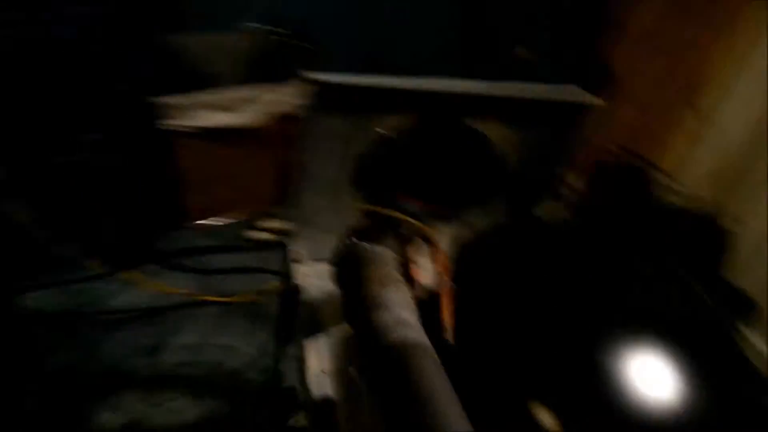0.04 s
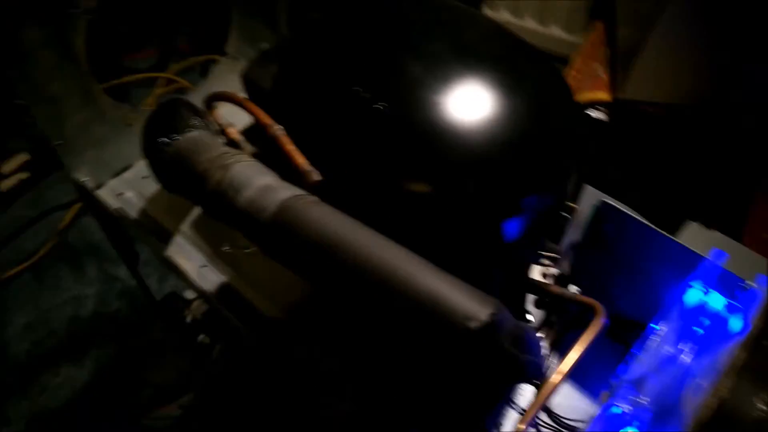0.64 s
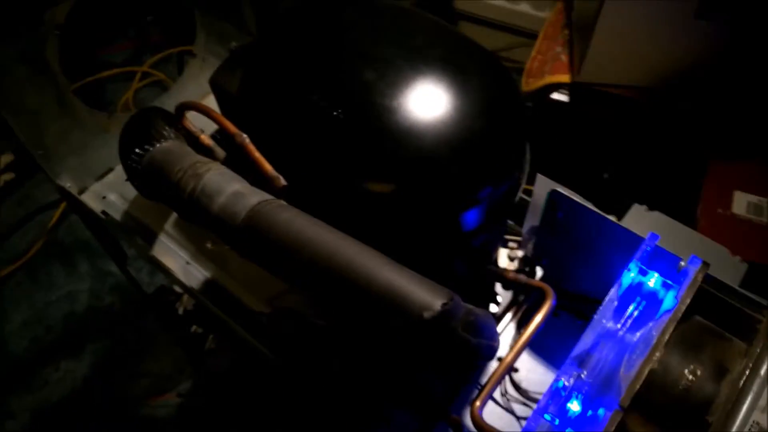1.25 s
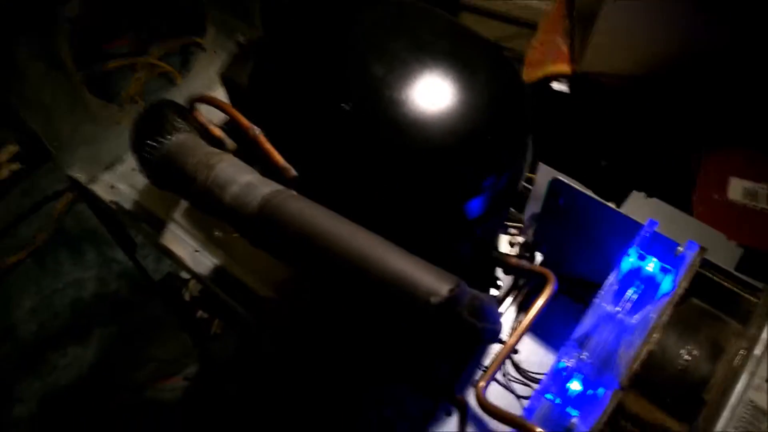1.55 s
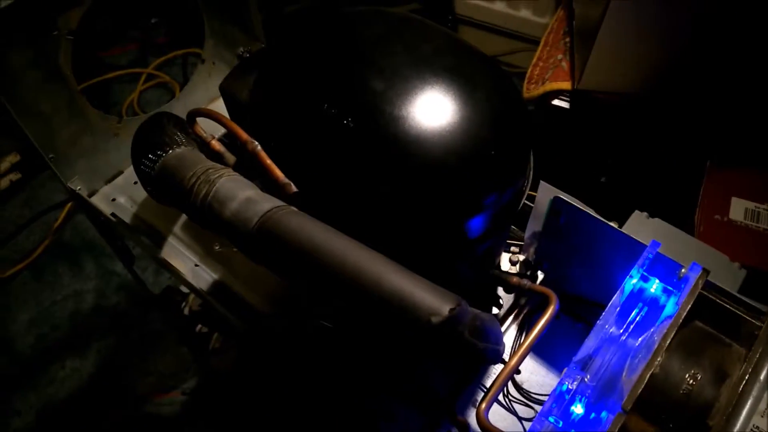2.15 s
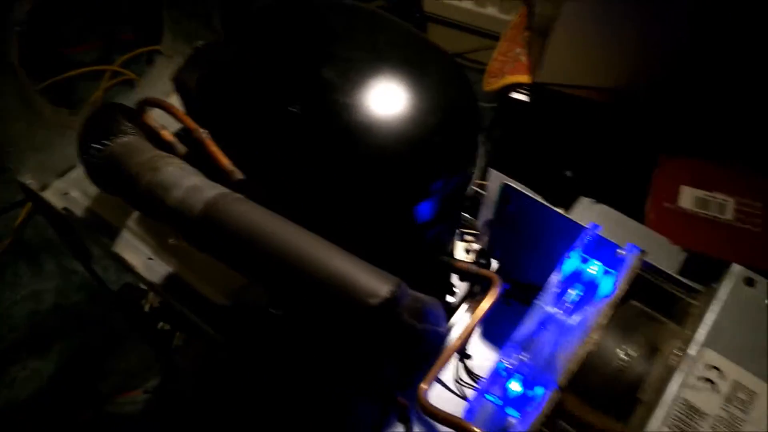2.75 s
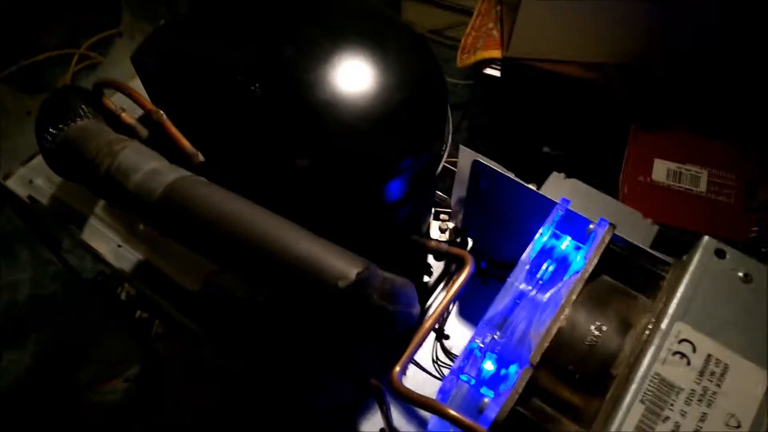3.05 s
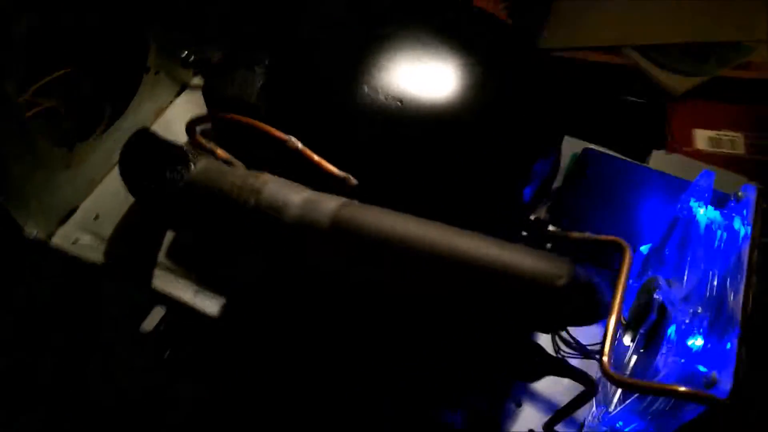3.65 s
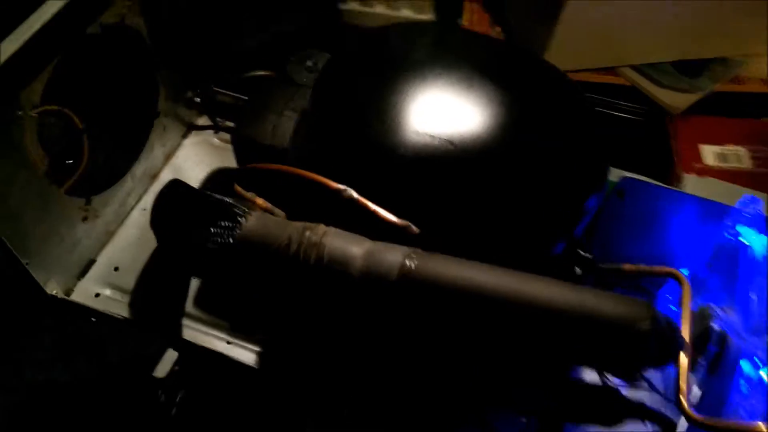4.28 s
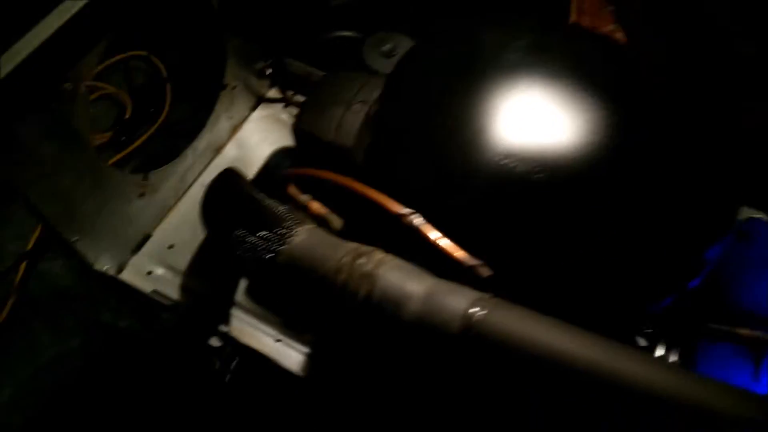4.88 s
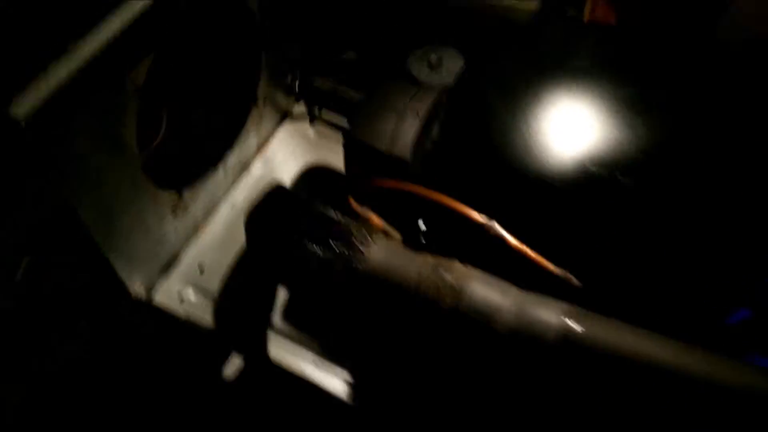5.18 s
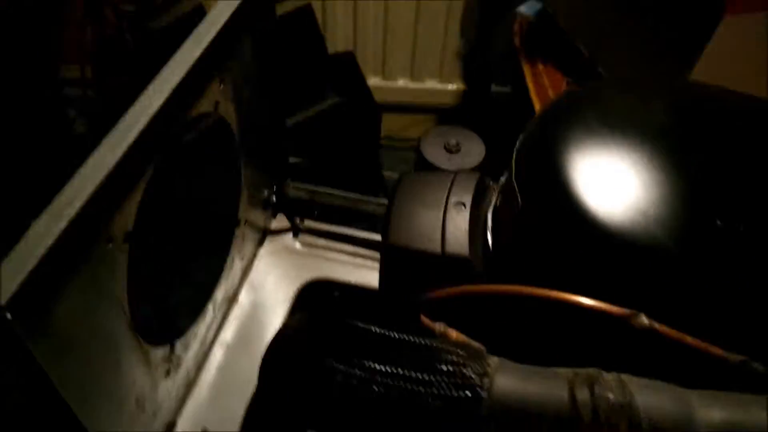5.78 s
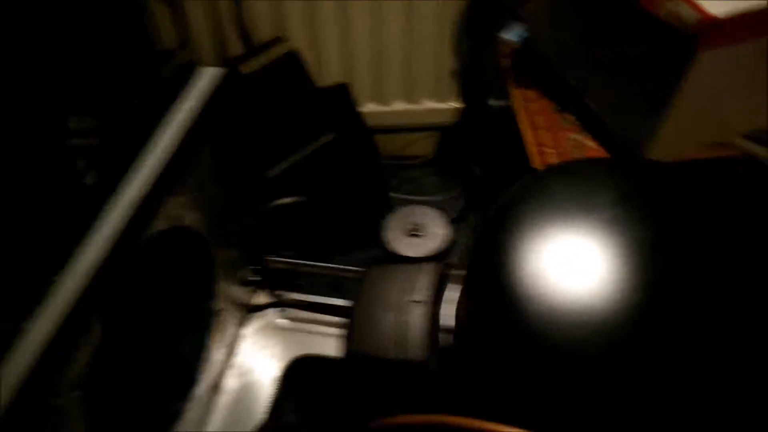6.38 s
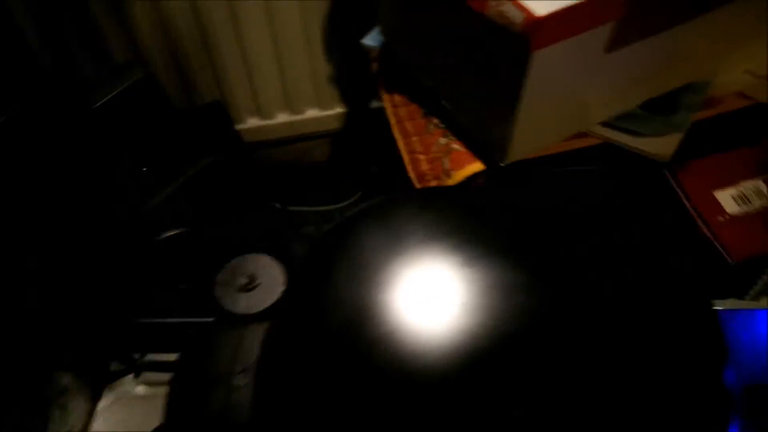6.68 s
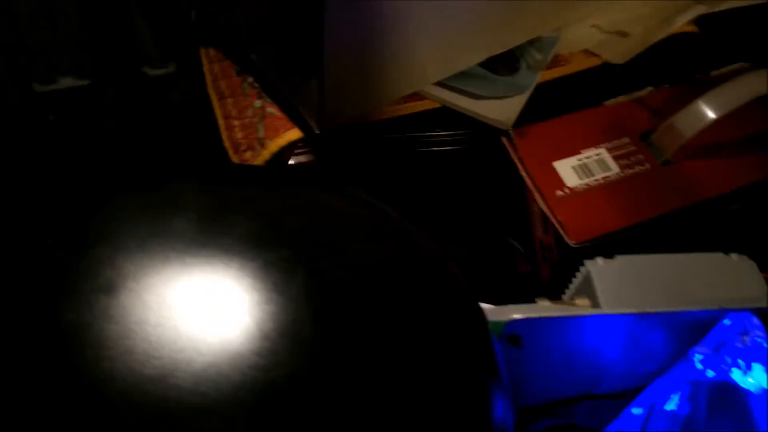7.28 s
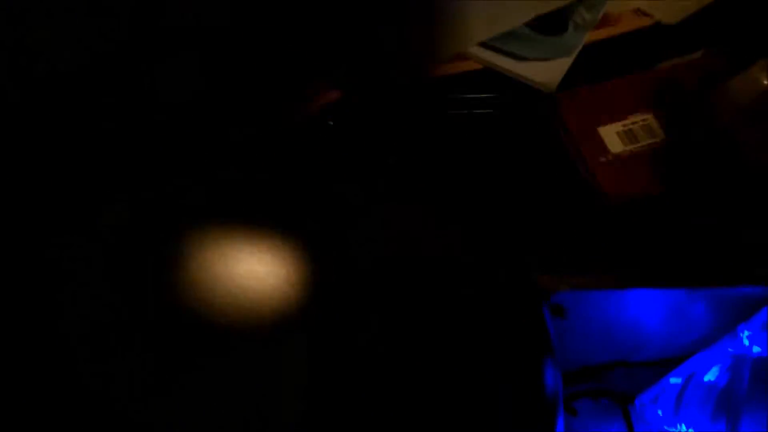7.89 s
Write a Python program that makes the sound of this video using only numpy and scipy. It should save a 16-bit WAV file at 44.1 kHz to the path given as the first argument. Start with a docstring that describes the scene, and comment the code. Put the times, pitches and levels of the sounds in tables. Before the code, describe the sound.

A cooling unit's fan and compressor whir and hum steadily with a thin, fast ticking, until a switch clicks sharply near the end.

```python
"""In a small room an open cooling unit runs. The piston strokes of its compressor excite the modes of
a steel shell, and gas sings in the pipes. A seven-blade fan adds tones, turbulent air noise and a
tick once a turn. A hand-held microphone moves through the standing waves above the unit, so each ring
swells and fades; fingers rub and bump it lightly. Near the end a switch snaps close by."""
import sys
import numpy as np
from scipy import signal
from scipy.fft import rfft, irfft, next_fast_len
from scipy.io import wavfile

SR = 44100
rng = np.random.default_rng(int(sys.argv[2]) if len(sys.argv) > 2 else 0)


def store_pcm(level_fs):
    """Save levels as 16-bit WAV."""
    pcm = np.round(np.clip(level_fs, -1, 1) * 32767).astype(np.int16)
    wavfile.write(sys.argv[1], SR, np.atleast_2d(pcm).T)


N = 358533
TIME = np.arange(N) / SR


# Shell and pipe modes. Each row: frequency and bandwidth in Hz, relative level and left-right
# difference in dB, name of the standing wave.
SHELL_MODES = [(2365, 45, -93, 13, "low ring"), (2474, 81, -84, -7.5, "low ring"),
               (2600, 23, -94, -4, "low ring"), (3089, 28, -78.5, -3, "twin ring"),
               (3256, 18, -81, -1.5, "low whistle"), (4242, 26, -82.5, 0, "middle ring"),
               (4526, 26, -77, 7.5, "middle whistle"), (6166, 28, -80, -4, "top ring"),
               (6430, 80, -90, -7, None), (8130, 58, -86.5, -15, None), (10200, 35, -89, -3, None)]
# Gas resonances in the pipes, with the same columns.
GAS_MODES = [(3254, 24, -83.5, 1.3, "low whistle"), (4514, 45, -79.5, 6, "middle whistle"),
             (6051, 48, -74, -9, "high whistle")]
COMPRESSOR_HZ = 49.33

def compressor(near_db, standing_db=1.95, whistle_waver_db=2.2, rough=0.28, stroke_s=.02):
    """Forced vibration: periodic piston impulses drive the shell's modes, over gas whistles and hum."""
    turns = COMPRESSOR_HZ * (TIME - stroke_s) + 0.0013 * drift(1.0)
    # One impulse per turn, shared between two samples.
    step = np.floor(turns) + np.minimum(turns % 1 * SR / COMPRESSOR_HZ, 1)
    knocks = np.diff(step, prepend=step[0]) * SR / COMPRESSOR_HZ / np.sqrt(2)
    knocks *= 1 + rough * drift(25)
    shell = gas = 0
    for hz, width, db, side_db, wave in SHELL_MODES:
        ring = at_ports(ringing(knocks, hz, width), hz, side_db, wave)
        shell += ring * from_db(db + standing_db * drift(3.5))
    for hz, width, db, side_db, wave in GAS_MODES:
        song = at_ports(whistle(hz, width), hz, side_db, wave)
        gas += song * from_db(db + whistle_waver_db * drift(7.5))
    return (shell + gas) * from_db(near_db) + hum(turns)


def whistle(hz, width):
    """Resonant filtering: a pipe narrows turbulence to a fluttering tone."""
    phasor = ringing(ringing(rng.standard_normal(N), hz, width), hz, width)
    return phasor / np.std(phasor.real)


# The hum's harmonics as multiples of the stroke rate, then their relative levels in dB.
HUM_ORDERS = [1, 2, 10]
HUM_DB = [-68, -83, -80]

def hum(turns, period_s=1.295, crest_s=1.73, depth_db=2):
    """Amplitude modulation: the frame, shaken at harmonics of the stroke, throbs slowly."""
    throb = from_db(depth_db * np.cos(2 * np.pi * (TIME - crest_s) / period_s))
    return tones(turns, HUM_ORDERS, HUM_DB, waver_db=0) * throb * pan(-2.5)


# The path through each standing wave. Each row: time in seconds, left gain and right gain in dB.
STANDING_WAVES = {"low ring": [(0.0, 5, 11), (0.6, -2, -11), (4.3, -3, 9), (4.9, -4.0, -7), (5.3, 3, 6),
                  (6.5, 0, -4), (7.5, 2, 8), (7.7, -7, 4), (8.1, 9, -3)], "twin ring": [(0.0, -0.5, 4.5),
                  (0.4, 9, -4), (2.6, -1.0, -9), (3.0, 8, -11), (4.0, -8, -1), (5.9, 11, -11),
                  (6.1, 5.0, -2), (7.1, -7.5, 7.5), (8.1, -14.5, 4)], "low whistle": [(0.0, -2.5, -4),
                  (1.2, -5, 7), (1.6, 7, -6), (3.2, 4, 8), (4.1, 9, -14), (5.3, -3, -6), (5.9, 1, -16),
                  (6.3, -1.0, -8), (6.7, -3, 1), (6.9, 0.5, 10.5), (8.1, 0, -5)],
                  "middle ring": [(0.0, -10.0, -4.0), (0.2, -5.5, -14.0), (0.6, -3.0, 3), (1.2, 0.5, 10),
                  (2.8, -2.0, -15), (3.0, -15.5, -15.5), (3.4, 2.5, -5), (5.1, 6, 0), (5.5, 11, 6),
                  (7.3, -11, 5.0), (8.1, -1, 4)], "middle whistle": [(0.0, 0, 7), (0.4, -2.5, 1.0),
                  (0.6, 6, 15), (4.3, 4, -11), (5.1, 5.5, -8), (5.3, 1.0, -10.0), (5.5, -2, -3),
                  (7.5, 0, -3), (8.1, 0.5, -2)], "high whistle": [(0.0, -2.5, 7), (1.2, 0.0, -1),
                  (1.6, -1.5, 7.5), (3.0, -8.5, 5), (3.2, 6, 9.5), (4.1, 6, -4), (5.1, 12, -10),
                  (5.7, -3, 0.5), (6.3, 10, -0.5), (7.1, -6, -6.0), (7.5, -1.5, -0.0), (7.7, -13, -17),
                  (8.1, 1, -7)], "top ring": [(0.0, 1.5, -4.5), (0.8, -6, -4), (1.4, 5.5, 5.5),
                  (2.0, 4, -8.0), (4.1, -1.0, 12), (5.3, 9, 12), (5.9, -8.5, -8), (7.1, 1, 11),
                  (8.1, 4.0, -11)]}
# Each entry: a standing wave, the left port's phase lead in radians.
LEFT_PORT_LEAD_RAD = {"low ring": -0.47, "twin ring": -1.5, "low whistle": -1.8, "middle ring": -1.7,
                      "middle whistle": 2.6, "high whistle": 0.91, "top ring": -0.5}
# The microphone turns. Each row: time in seconds, the left port's lead in milliseconds.
ARRIVAL_LEAD = [(0, .04), (3.3, .008), (4.8, .053), (5.5, .156), (6.25, .163), (7.0, -.136), (8.1, -.194)]

def at_ports(phasor, hz, side_db, wave):
    """Spatial sampling: the microphone's two ports meet a standing wave at unequal level and phase."""
    lead = LEFT_PORT_LEAD_RAD.get(wave, 0) + 2 * np.pi * hz * in_time(ARRIVAL_LEAD)[0] / 1000
    half_shift = np.exp(.5j * lead)
    wave_db = np.array(in_time(STANDING_WAVES[wave])) if wave else 0
    return np.real([phasor * half_shift, phasor / half_shift]) * from_db(wave_db) * pan(side_db)


FAN_HZ = 27.725

def fan(near_db, tick_phase=0.855, jitter_turns=0.0019):
    """Rotor noise: the blades give tones and broadband air, and a contact recurs once a turn."""
    turns = FAN_HZ * TIME + 0.00736 * drift(2.44)
    airflow = blade_tones(turns, near_db) + air(near_db)
    since_contact = (turns + jitter_turns * drift(9.9) - tick_phase) % 1 / FAN_HZ
    return airflow + hiss(since_contact) + pings(since_contact)


# The fan's main note. Each row: time in seconds, level and left-right difference in dB.
NOTE_LEVEL = [(0, -64, -6), (.3, -65.5, -3), (.9, -68, -5), (1.8, -70.5, -5), (2.6, -71, -3),
              (3.1, -70.5, -11), (3.6, -68, 7), (4.3, -70.5, -8), (4.85, -64, -11), (5.7, -69, -12),
              (6.3, -68, 0), (6.9, -68.5, -6), (7.4, -62.5, -5), (8.1, -63.5, -8)]
# Its lower tones as multiples of the turn rate, then their relative levels in dB.
FAN_ORDERS = [7, 14, 24]
FAN_TONE_DB = [-75, -78.5, -85]

def blade_tones(turns, near_db, note_order=28, flutter=0.27):
    """Rotational harmonics: the main note lies at four times the blade-passing frequency."""
    note_db, side_db = in_time(NOTE_LEVEL)
    note = tones(turns, [note_order], [note_db], waver_db=-0.05) * pan(side_db)
    low_tones = tones(turns, FAN_ORDERS, FAN_TONE_DB, waver_db=1.2) * from_db(near_db) * pan(-3)
    return (note + low_tones) * (1 + flutter * drift(11))


# Spectra of the low and middle air noise. Each row: frequency in Hz, relative density in dB.
LOW_AIR = [(25, -20), (42, -7), (70, 1.5), (115, -6.5), (155, 0), (180, -4.5), (225, -0.5), (330, -0.5),
           (430, -6.5), (510, -1.5), (620, -16.5), (1000, -51)]
MID_AIR = [(300, -17), (560, -6.5), (670, 1.5), (800, -1), (1000, -3.5), (1250, -7.5), (1700, -9),
           (2200, -12.5), (3000, -15), (4000, -17), (6000, -17), (16000, -29.5)]
# Passes through the draught. Each row: centre in seconds, gain in dB, half length in seconds.
DRAUGHTS = [(.27, 2.5, 0.16), (1.7, 0.5, 0.51), (3.85, 1.1, 0.16), (6.3, -0.5, 0.25), (7.65, 2.5, 0.48)]

def air(near_db, low_db=-60.5, mid_db=-58.5, near_share=0.34):
    """Turbulence: the low band grows with nearness, and the middle band varies in the draught."""
    low = from_db(low_db + near_share * near_db) * noise(LOW_AIR) * pan(-2.2)
    middle = from_db(mid_db + swells(DRAUGHTS)) * noise(MID_AIR) * pan(-0.54)
    return low + middle


# Spectra of the hiss and the scrape. Each row: frequency in Hz, relative density in dB.
HISS_SPECTRUM = [(2500, -33), (4000, -15), (5000, -6), (5700, -1.5), (6400, 2.5), (7200, 0), (7800, -1),
                 (8200, -4), (8500, -10), (11000, -8.5), (12100, -14), (13200, -11.5), (14000, -14.5),
                 (15700, -9)]
SCRAPE_SPECTRUM = [(2000, -29), (4000, -31), (5000, 2.5), (5500, -0.5), (6100, -3), (7200, -2), (7700, -11),
                   (8200, 2), (8600, -9), (12000, -14), (13200, -7), (14200, -27), (15700, -25)]
# Their joint gain, left-right difference and upper-band gain. Each row: time in seconds, value in dB.
HISS_GAIN = [(0, -61.5), (.35, -60.5), (.8, -67), (1.35, -67.5), (1.6, -64), (2.0, -67.5), (5.5, -60),
             (8.1, -62.5)]
HISS_SIDE = [(0, -4), (1.7, -15.5), (3.3, -11.5), (6.3, -1.5), (7.2, -8.5)]
SHEEN = [(0, 0), (1.3, -3.5), (2.0, 1.5), (3.75, 1.5), (4.2, -4.5), (5.7, -4), (6.8, 0), (8.1, -2)]

def hiss(since_contact, rise_s=0.0007, decay_s=0.007, sheen_hz=(7300, 8800)):
    """Modulated noise: the rotor's scrape adds a brief burst to the fan's hiss on every turn."""
    burst = np.exp(-since_contact / decay_s) * (1 - np.exp(-since_contact / rise_s))
    treble = from_db(-1.63) * noise(HISS_SPECTRUM)
    treble += 2 * from_db(-3) * burst * noise(SCRAPE_SPECTRUM)
    upper = signal.sosfiltfilt(signal.butter(2, sheen_hz, "band", fs=SR, output="sos"), treble)
    treble += (from_db(in_time(SHEEN)[0]) - 1) * upper
    return from_db(in_time(HISS_GAIN)[0]) * treble * pan(in_time(HISS_SIDE)[0])


# The rotor's two chirps. Each row: start and end frequency in Hz, delay and rise in seconds.
CHIRPS = [(4900, 6380, 0.00021, 0.00092), (6380, 7450, 0.0017, 0.0013)]
# Each row: time in seconds, then in dB the low chirp's relative level, its left-right difference
# and the high chirp's relative level.
CHIRP_LEVELS = [(0, -56, -14, -70), (.8, -61, -5, -67), (1.3, -61, -5, -75), (2.0, -61, -3, -60.5),
                (3.2, -55.5, -5, -60), (3.75, -62, -1, -60), (4.2, -57, 1, -69), (4.7, -54.5, -12, -67),
                (5.2, -54.5, -4, -71), (6.1, -62, 8, -76), (6.7, -58.5, 2, -73), (7.2, -56, -2, -71),
                (8.1, -62, -2, -73)]

def pings(since_contact, glide_s=.0014, high_side_db=-19, uneven_db=1.8):
    """Frequency glide: each rotor contact gives two quick upward chirps, low then high."""
    low_db, low_side_db, high_db = in_time(CHIRP_LEVELS)
    levels = [(low_db, low_side_db), (high_db, high_side_db)]
    chirps = 0
    for (start_hz, end_hz, delay, rise), (db, side_db) in zip(CHIRPS, levels):
        age = np.maximum(since_contact - delay, 0)
        cycles = end_hz * age - (end_hz - start_hz) * glide_s * (1 - np.exp(-age / glide_s))
        swell = .85 * (age / rise * np.exp(1 - age / rise)) ** 2
        chirps += swell * np.sin(2 * np.pi * cycles) * from_db(db + uneven_db * drift(16)) * pan(side_db)
    return chirps


# The switch's contacts. Each row: start in seconds, relative level in dB.
CONTACTS = [(7.8446, -12), (7.8453, -6.5), (7.8459, -19), (7.8475, -16)]
# Its modes. Each row: frequency and bandwidth in Hz, gain and left-right difference in dB.
SWITCH_MODES = [(3260, 1200, -36, -4), (5630, 250, -0.5, -7), (6970, 2000, -0.5, -16),
                (9000, 420, -17, -13), (10200, 890, -17.5, -11), (15100, 1000, -22, -9)]
# The room's answer to press, snap and release. Each row: start in seconds, level in dB, T60 in seconds.
ECHOES = [(7.48, -44.5, 0.12), (7.846, -35, 0.14), (7.955, -45, 0.16)]
# Its spectrum. Each row: frequency in Hz, relative density in dB.
ECHO_SPECTRUM = [(1000, -13), (2500, -13.5), (3300, -8.5), (4600, -9), (5300, 0.5), (5700, -2),
                 (6300, -3.5), (7200, -1), (8500, -11), (10000, -16), (16000, -26)]

def switch():
    """Impact and reverberation: contacts ring the switch, its spring rings on, and the room answers."""
    snap = sum((-1) ** k * strike(CONTACTS, [(hz, width, db)]) * pan(side_db)
               for k, (hz, width, db, side_db) in enumerate(SWITCH_MODES))
    spring = rms_one(resonate(noise(ECHO_SPECTRUM), hz=5800, width=300))
    spring *= from_db(-31) * dying(CONTACTS[-1][0], t60=0.16)
    room = sum(from_db(db) * dying(s, t60) for s, db, t60 in ECHOES) * noise(ECHO_SPECTRUM)
    return snap + (room + spring) * pan(-1.0)


# Finger rubs, grip shifts and a swing of the microphone.
# Each row: centre in seconds, level in dB, half length in seconds.
RUBS = [(0.44, -51.5, 0.017), (0.53, -47.5, 0.011), (0.557, -50.5, 0.0062), (1.63, -68, 0.016),
        (1.671, -60.5, 0.0077), (1.718, -53, 0.012), (5.958, -52, 0.0059)]
GRIP_SHIFTS = [(7.42, -65, 0.12), (7.69, -52.5, 0.056), (7.955, -57.5, 0.058), (8.12, -48, 0.033)]
SWING = [(.28, -66, .1)]
# Their spectra. Each row: frequency in Hz, relative density in dB.
RUB_SPECTRUM = [(2000, -30), (4000, -14.5), (5500, -4.5), (6500, 2), (7300, 4), (8200, -5.5), (9500, -18),
                (12000, -20), (16000, -22)]
GRIP_SPECTRUM = [(20, -27), (40, 1), (60, 9), (95, -1), (150, -5), (250, -18), (600, -39)]
SWING_SPECTRUM = [(800, -12), (1400, 0), (2500, -2), (4000, -16)]

def handling():
    """Friction noise: fingers slide, the grip rumbles, and the swinging microphone swishes."""
    rubs = strokes(RUBS) * noise(RUB_SPECTRUM) * pan(-18)
    rumble = strokes(GRIP_SHIFTS) * noise(GRIP_SPECTRUM) * pan(-24)
    swish = strokes(SWING) * noise(SWING_SPECTRUM)
    return rubs + rumble + swish


# Runs of slips. Each row: start in seconds, relative level in dB, length in seconds.
CREAKS = [(1.4812, -23.5, .0065), (5.943, -35, .0005), (7.482, -35, .0005)]
# The casing's modes. Each row: frequency and bandwidth in Hz, gain in dB.
CASING_MODES = [(4340, 510, -12), (5700, 2000, -1.5), (7230, 410, -2.5)]

def creaks(gap_s=0.0011, loss_db=1.5):
    """Stick-slip motion: each slip of a run rings the casing more weakly than the last."""
    slips = [(s + age + gap_s * rng.uniform(-0.16, 0.231), db - loss_db * k)
             for s, db, length in CREAKS for k, age in enumerate(np.arange(0, length, gap_s))]
    return strike(slips, CASING_MODES) * from_db(-10) * pan(-25)


# Finger bumps and hollow knocks. Each row: start in seconds, relative level in dB, T60 in seconds.
BUMPS = [(.937, -44, 0.084), (7.16, -45, .1), (7.314, -45, 0.1), (7.687, -37, 0.065), (7.972, -36, 0.062)]
KNOCKS = [(5.608, -34.5, 0.027), (5.622, -36, 0.032), (8.11, -30, 0.038)]

def bumps():
    """Damped oscillation: fingers thud beside the right port, and knocks reach both sides."""
    blows = thuds(BUMPS, hz=86.5) * pan(-19.5) + thuds(KNOCKS, hz=270) * pan(-3)
    return signal.sosfilt(signal.butter(2, 50, "high", fs=SR, output="sos"), blows)


# Light ticks. Each row: start in seconds, relative level in dB.
TICKS = [(6.15, -33), (7.187, -47), (7.403, -45)]

def ticks():
    """Impulse response: two high, heavily damped modes give a thin, bright tick."""
    return strike(TICKS, modes=[(7940, 1100, -4), (14500, 4000, -5)]) * pan(-11)


# Likeness of the two channels. Each row: frequency in Hz, correlation coefficient.
COHERENCE = [(30, 0.41), (120, 0.83), (300, 0.86), (750, 0.57), (1300, 0.14), (2500, 0), (5000, 0),
             (16000, 0.026)]

def noise(spectrum):
    """Partial coherence: coloured stereo noise of rms 1, its channels more alike in the bass."""
    size = next_fast_len(N)
    log_hz = np.log(np.maximum(np.fft.rfftfreq(size, 1 / SR), 1))

    def at_hz(rows, **ends):
        hz, values = np.transpose(rows)
        return np.interp(log_hz, np.log(hz), values, **ends)

    alike = at_hz(COHERENCE)
    gain = from_db(at_hz(spectrum, left=-70, right=-70))
    mid, side = rfft(rng.standard_normal((2, size)))
    stereo = np.sqrt(1 + alike) * mid + np.sqrt(1 - alike) * side * [[1], [-1]]
    return rms_one(irfft(gain * stereo, size)[:, :N])


def tones(turns, orders, levels_db, waver_db):
    """Fourier synthesis: shaft harmonics of random phase, wavering in level."""
    return sum(np.sqrt(2) * from_db(db + waver_db * drift(1.4))
               * np.sin(2 * np.pi * (k * turns + rng.random())) for k, db in zip(orders, levels_db))


def strike(contacts, modes):
    """Modal superposition: each contact rings all the modes of a small body."""
    clicks = np.zeros(N)
    for s, db in contacts:
        clicks[round(s * SR)] += from_db(db)
    age = TIME[:SR // 20]
    ring = sum((-1) ** k * from_db(db) * np.exp(-np.pi * width * age) * np.sin(2 * np.pi * hz * age)
               for k, (hz, width, db) in enumerate(modes))
    return signal.fftconvolve(clicks, ring)[:N]


def thuds(rows, hz):
    """Free vibration of one damped mode after each blow."""
    return sum(from_db(db) * dying(s, t60) * np.sin(2 * np.pi * hz * (TIME - s)) for s, db, t60 in rows)


def ringing(x, hz, width):
    """Narrow resonance as a rotating phasor, whose real part has a peak gain of 1."""
    r = np.exp(-np.pi * width / SR)
    return signal.lfilter([2 * (1 - r)], [1, -r * np.exp(2j * np.pi * hz / SR)], x)


def resonate(x, hz, width):
    """Two-pole resonance with a peak gain of 1."""
    r = np.exp(-np.pi * width / SR)
    feedback = [1, -2 * r * np.cos(2 * np.pi * hz / SR), r * r]
    return signal.lfilter(np.array([1, 0, -1]) * (1 - r * r) / 2, feedback, x)


def dying(s, t60):
    """Exponential decay from 1 at time s, by 60 dB in t60 seconds."""
    return (TIME >= s) * np.exp(-np.minimum(np.log(1000) * np.abs(TIME - s) / t60, 20))


def swells(rows):
    """Gaussian pulses, summed."""
    return sum(height * np.exp(-.5 * np.minimum(((TIME - s) / half) ** 2, 20))
               for s, height, half in rows)


def strokes(rows):
    """Gaussian envelopes of hand movements, with heights in dB."""
    return swells([(s, from_db(db), half) for s, db, half in rows])


def drift(hz):
    """Random fluctuation of rms 1, low-passed at hz."""
    hop, settle = 100, 2000
    r = np.exp(-2 * np.pi * hz * hop / SR)
    slow = signal.lfilter([1], [1, -2 * r, r * r], rng.standard_normal(N // hop + settle + 2))[settle:]
    return np.interp(np.arange(N) / hop, np.arange(len(slow)), rms_one(slow))


def in_time(rows):
    """Linear interpolation of each column at every sample."""
    s, *columns = np.transpose(rows)
    return [np.interp(TIME, s, column) for column in columns]


def pan(side_db):
    """Level panning: two gains for a left-minus-right difference."""
    return from_db(np.array([[.5], [-.5]]) * side_db)


def from_db(db):
    """Decibels to amplitude ratio."""
    return 10 ** (np.asarray(db) / 20)


def rms_one(x):
    """Normalisation to an rms of 1."""
    return x / np.sqrt(np.mean(x ** 2) + 1e-20)


# The microphone's nearness to the unit. Each row: time in seconds, gain in dB.
NEARNESS = [(0, -3), (.3, 1), (.8, -0.5), (2.4, -2), (3.8, -0.7), (5.5, 2.5), (6.45, 4), (7.2, 6),
            (8.1, 9.5)]

def scene():
    """Superposition: the running unit, the switch and the hand's noises add."""
    near_db, = in_time(NEARNESS)
    return compressor(near_db) + fan(near_db) + switch() + handling() + creaks() + bumps() + ticks()


def record(dry, cutoff_hz=15800):
    """Band limiting: a steep low-pass filter removes the highest treble."""
    return signal.sosfilt(signal.ellip(12, .1, 70, cutoff_hz, fs=SR, output="sos"), dry)


dry = scene()
out = record(dry)
store_pcm(out)
```